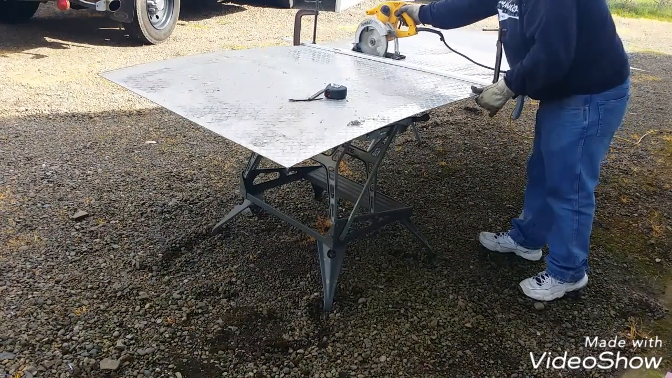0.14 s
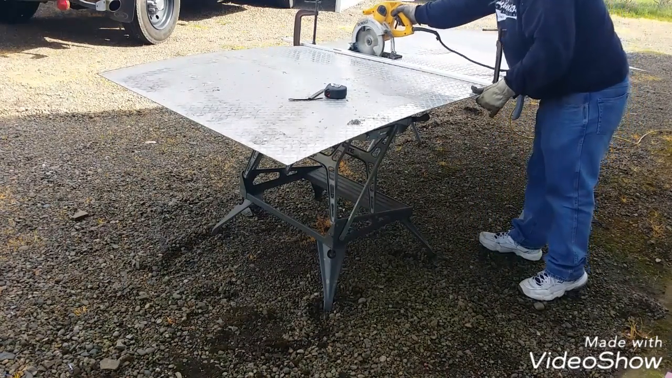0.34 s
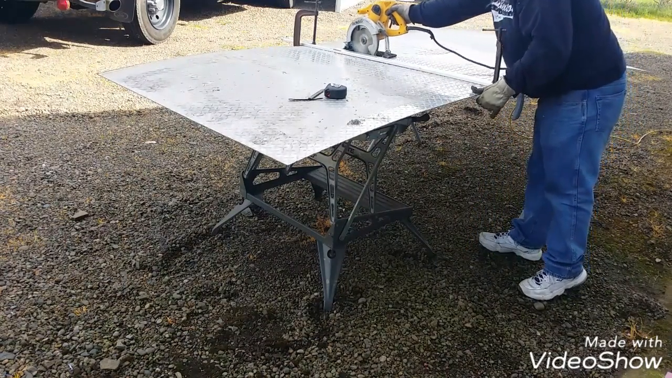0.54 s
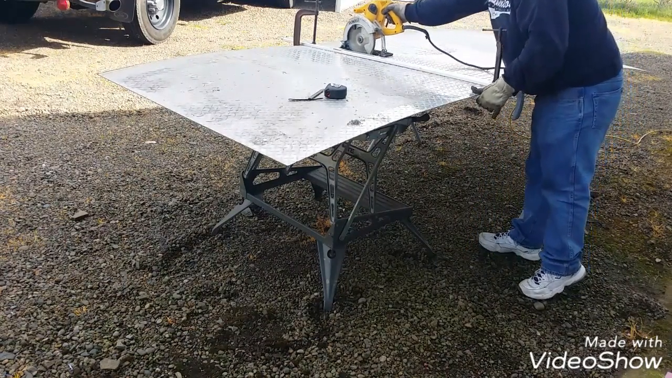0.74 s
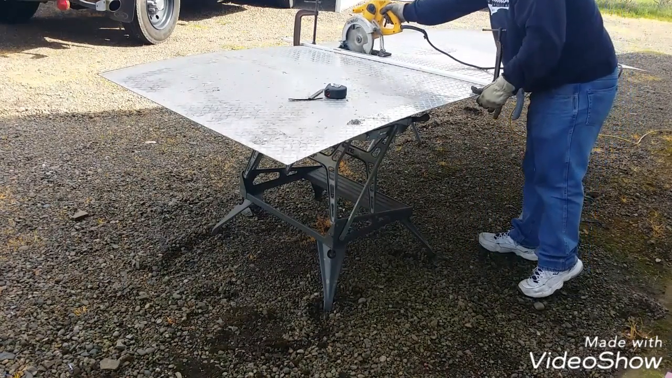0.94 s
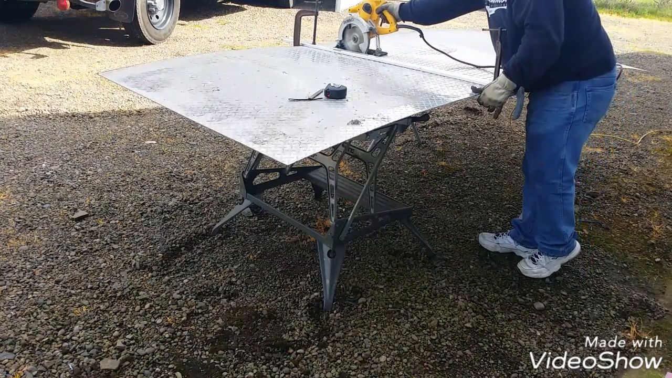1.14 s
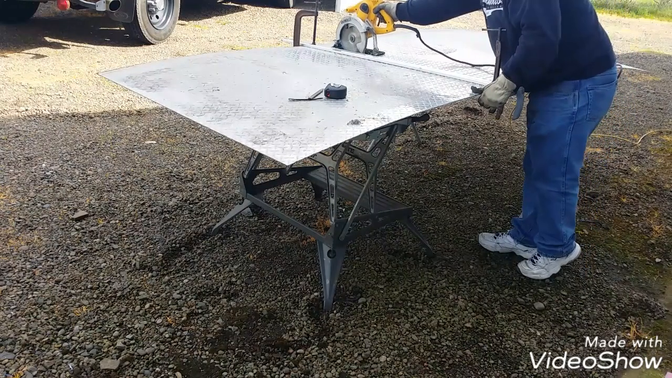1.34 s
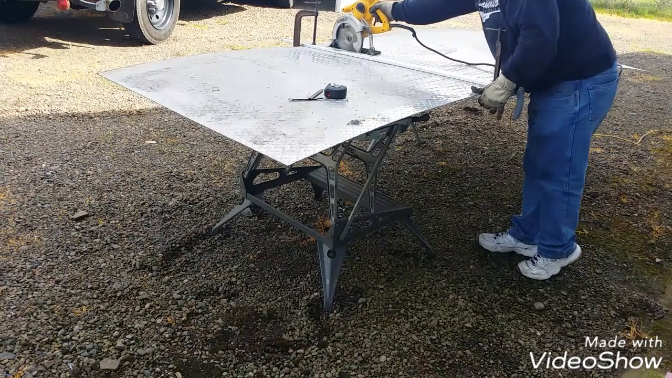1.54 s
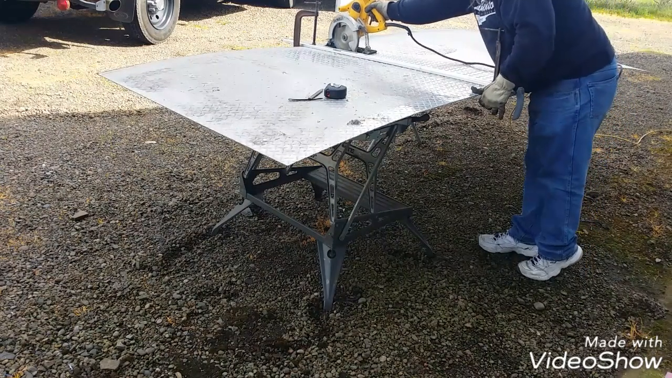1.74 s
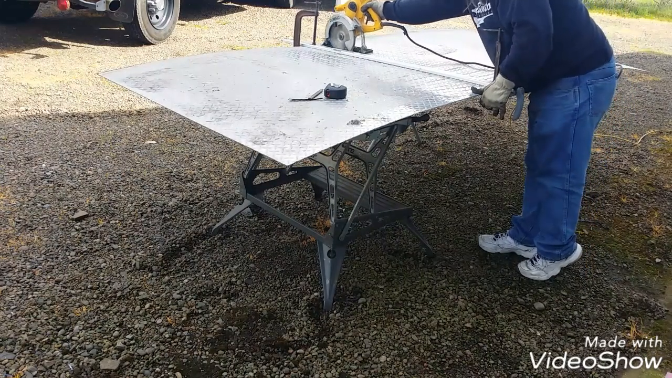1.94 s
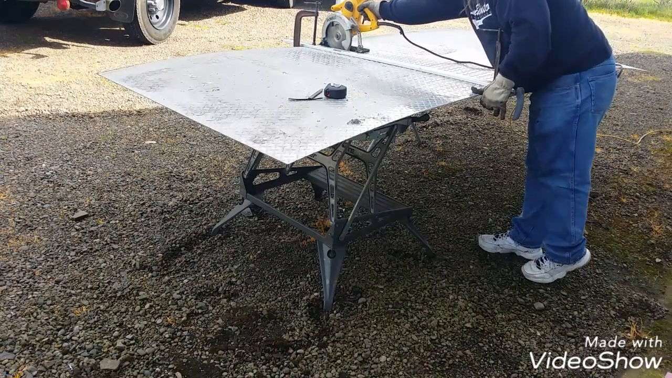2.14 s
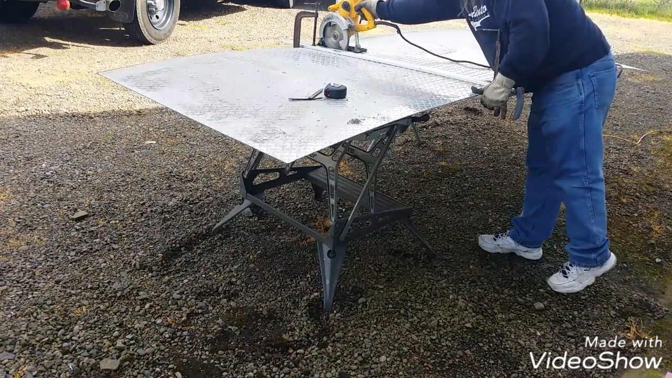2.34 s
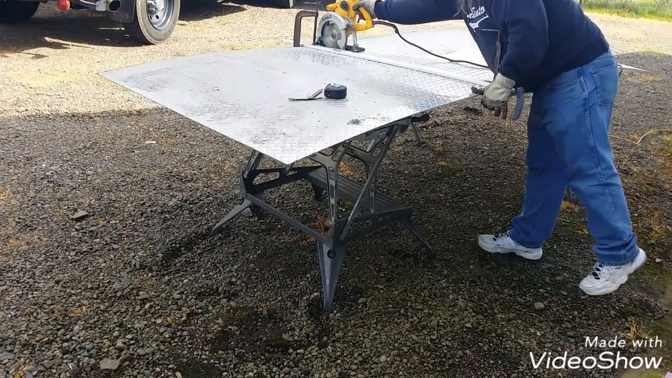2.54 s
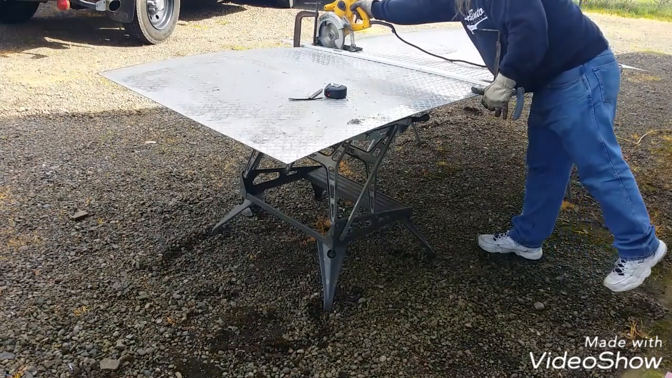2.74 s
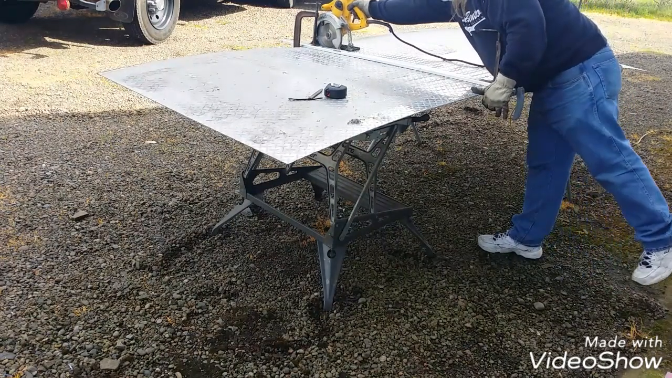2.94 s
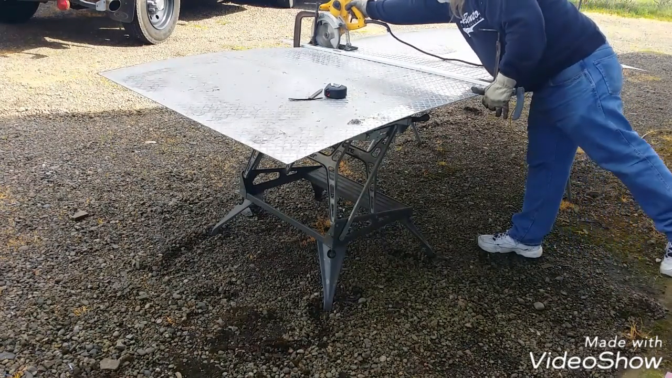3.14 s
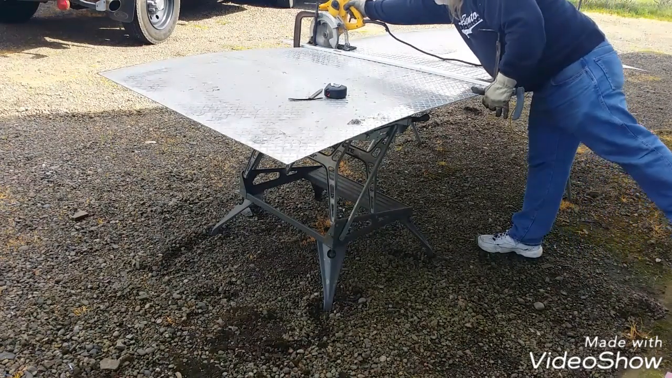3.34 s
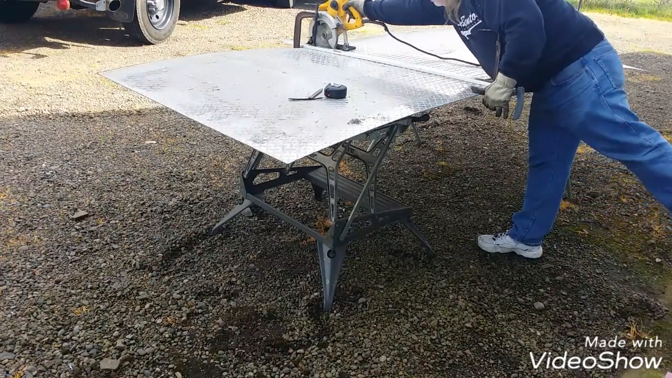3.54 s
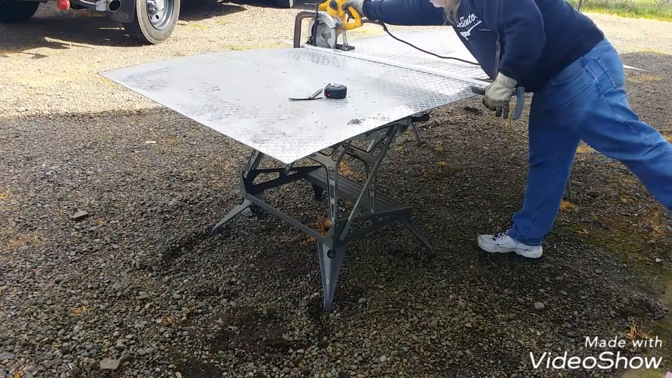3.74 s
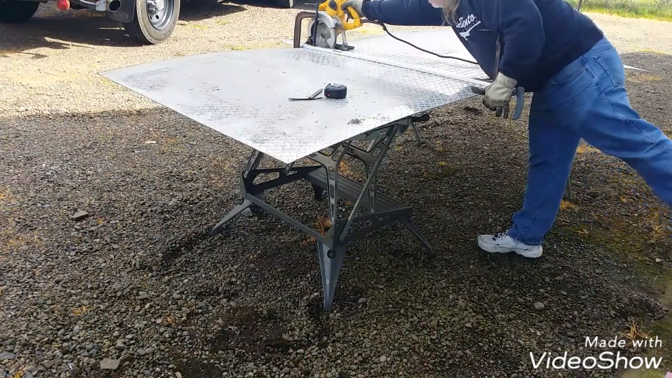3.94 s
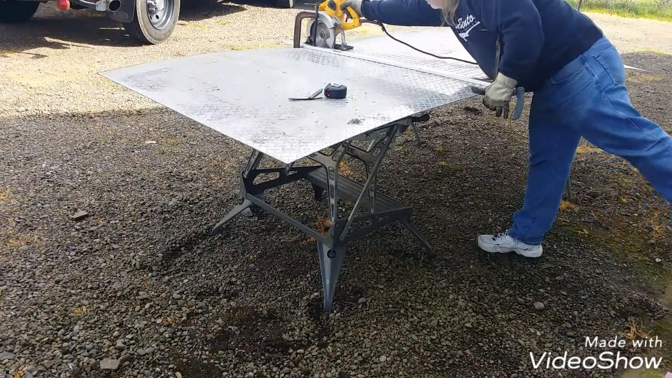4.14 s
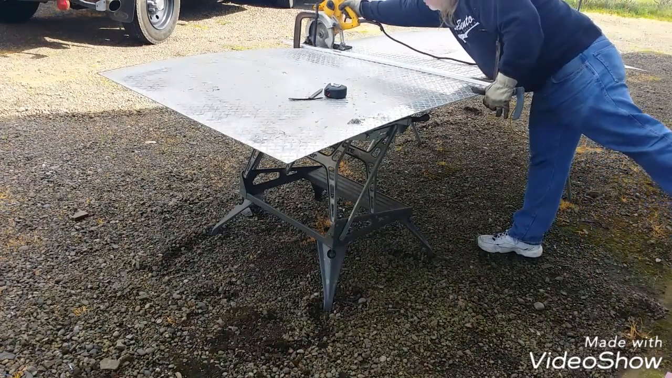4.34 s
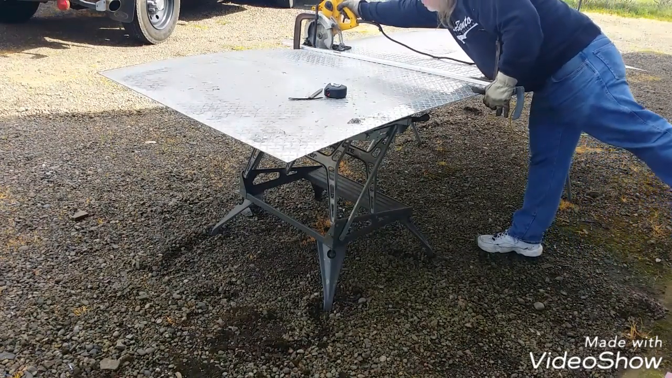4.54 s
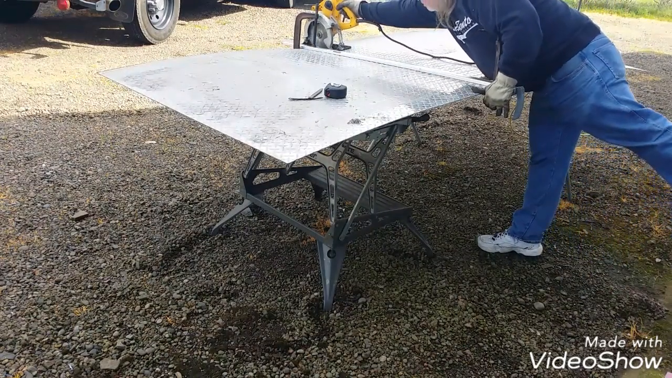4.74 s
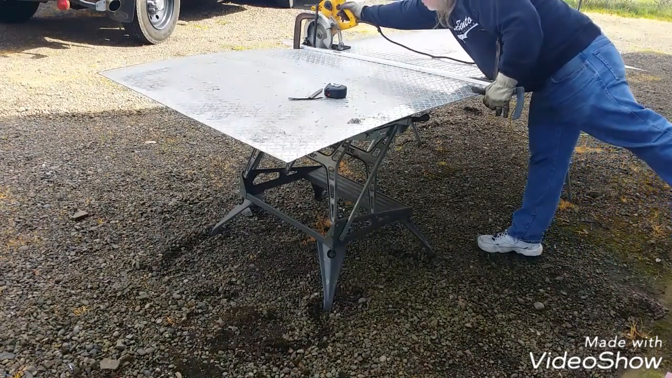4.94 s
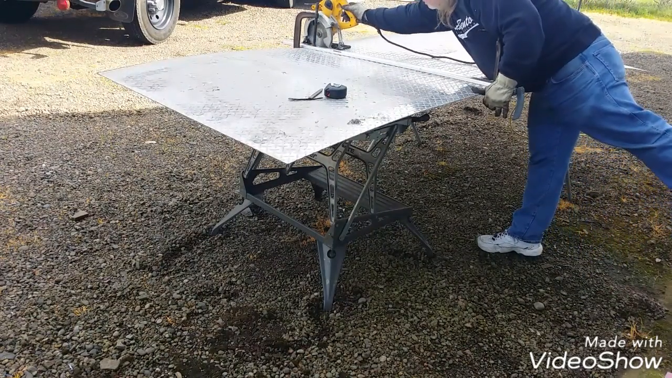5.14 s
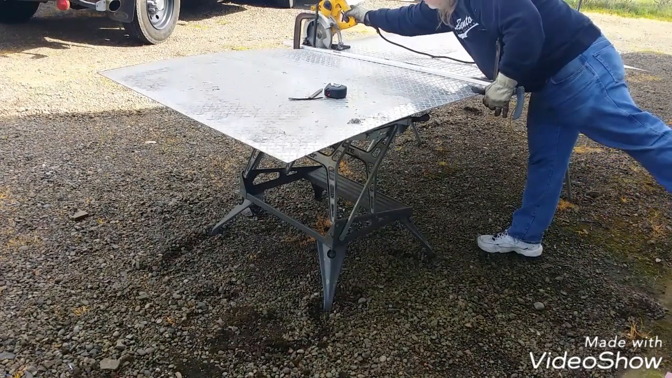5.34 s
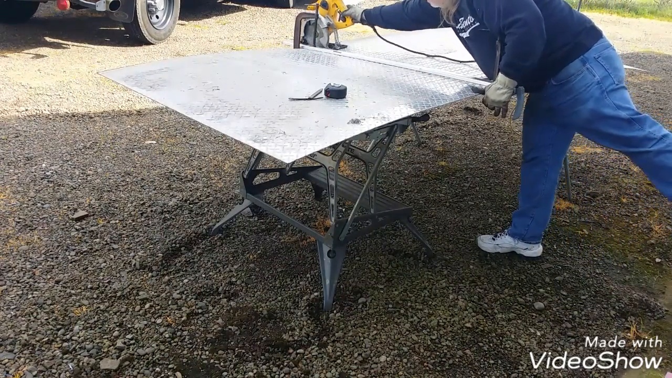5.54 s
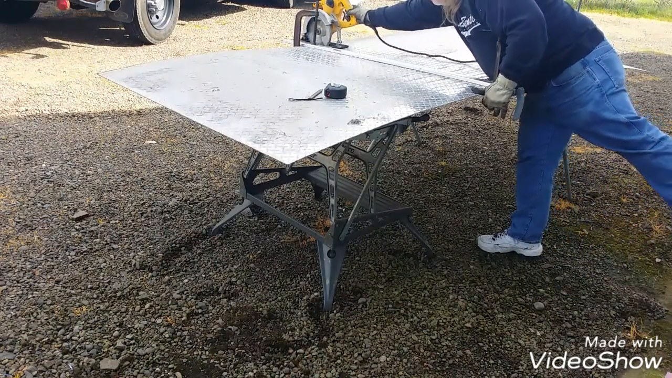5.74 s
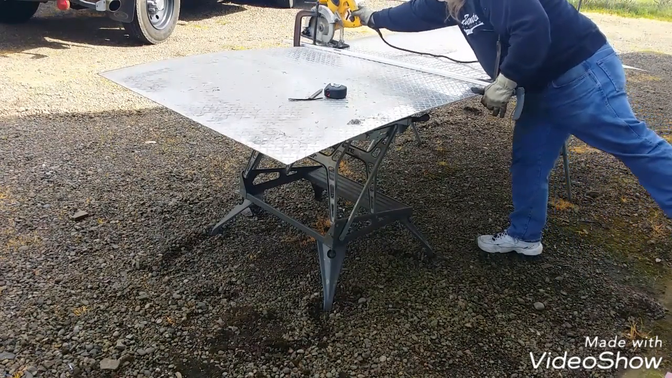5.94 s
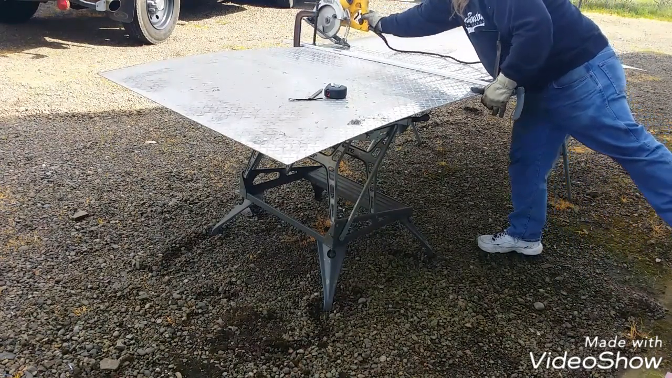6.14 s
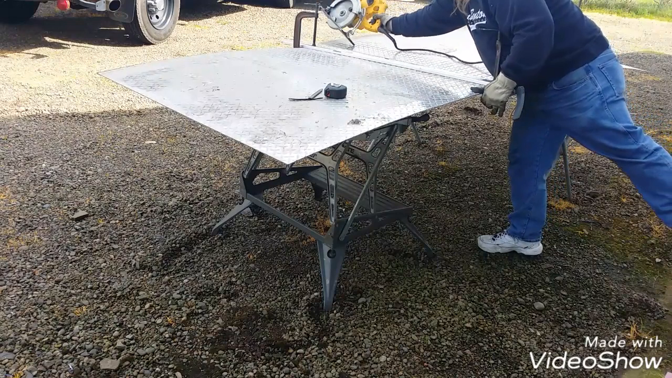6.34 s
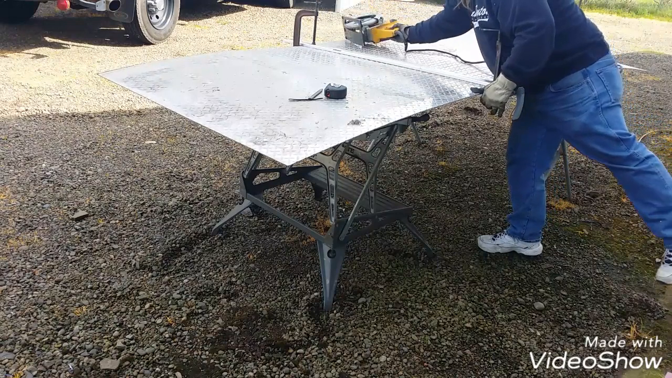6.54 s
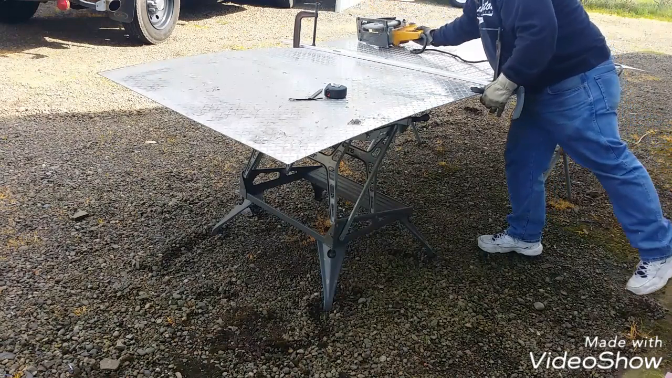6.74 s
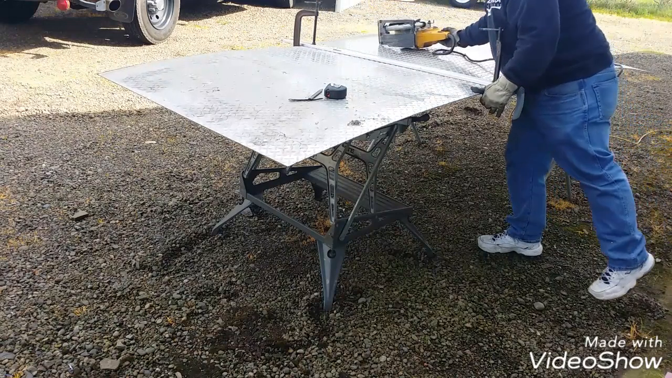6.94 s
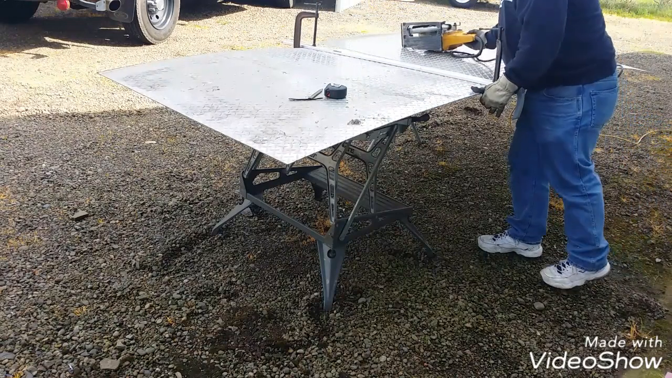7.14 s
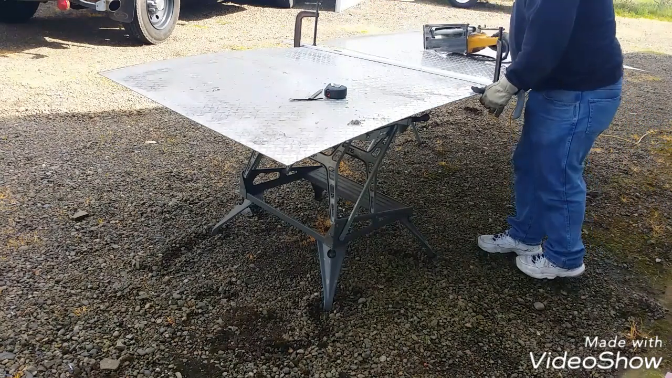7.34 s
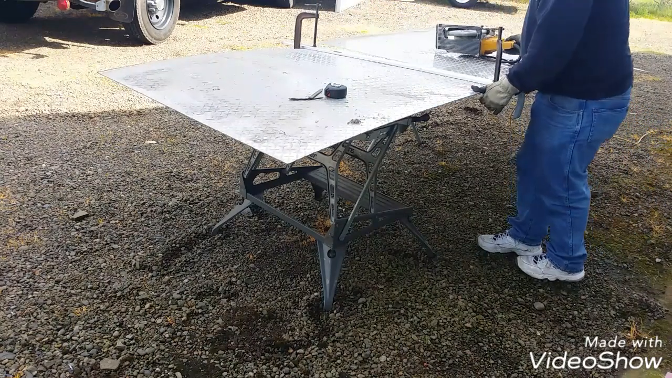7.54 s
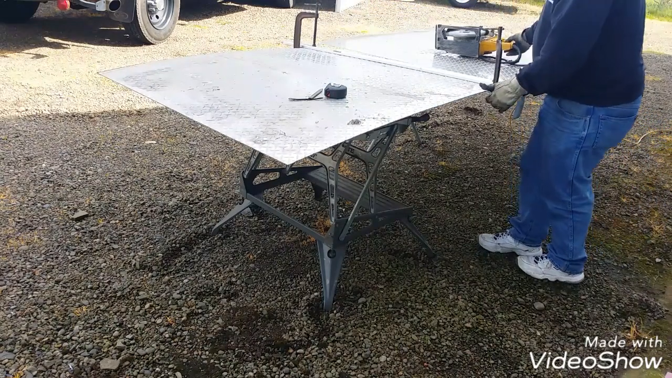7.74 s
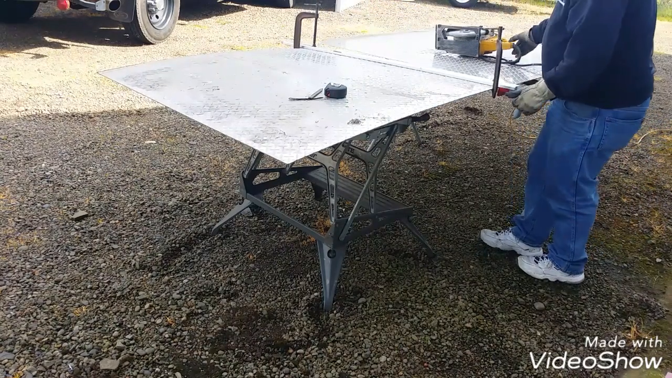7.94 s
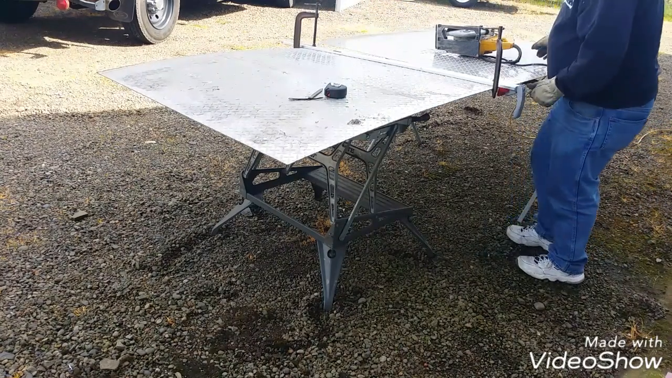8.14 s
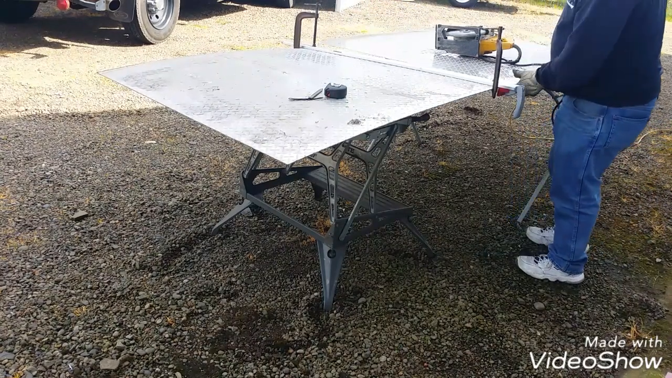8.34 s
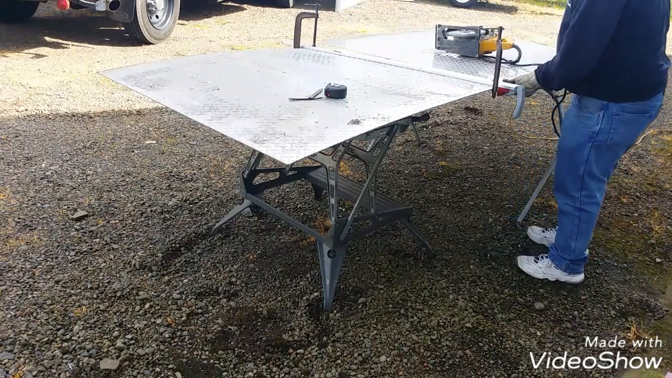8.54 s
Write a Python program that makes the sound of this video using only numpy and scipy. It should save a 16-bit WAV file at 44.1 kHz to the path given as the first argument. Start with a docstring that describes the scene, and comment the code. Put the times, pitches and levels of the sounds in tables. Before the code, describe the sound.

From 0 s a circular saw is already cutting an aluminium sheet outdoors: loud, harsh, bright chip hiss with a midrange roar, ringing blade squeal and a tooth whine around 2 kHz. The pitch sags over the first second, wavers low until about 2.1 s, then climbs gradually as the load lightens. A sharper squeal flares near 4.4 s. Around 4.95 s the power goes off; the whine drops in level and glides downward, roughening, while the blade still hisses in the slot. At 6.0-6.3 s it leaves the cut with a brief ring and the hiss collapses. A clack lands at about 6.65 s. From 6.9 to 7.9 s the saw is dragged over the sheet, booming, drumming, rasping and knocking, strongest around 7.3-7.5 s, with gritty crunching. It fades toward 8.5 s, under the last of the whine. Light low wind buffets and small puffs occur intermittently.

```python
"""A circular saw rips through an aluminium sheet on a stand outdoors: tooth impacts excite chip hiss and roar,
friction rings the blade's modes, and rotation makes a whine that follows the load. Power goes off near five
seconds; the coasting saw is lifted out, set down with a clack and dragged back across the booming sheet,
whose modes are driven by random contact. Low-passed turbulence gives a light breeze with gusts and puffs."""
import sys
import numpy as np
from scipy import signal
from scipy.fft import rfft, irfft
from scipy.io import wavfile
from scipy.ndimage import map_coordinates

SR = 44100
rng = np.random.default_rng(int(sys.argv[2]) if len(sys.argv) > 2 else 0)


def generate_wav(signal):
    """Clip the signal to [-1, 1] and save it as 16-bit WAV at the path in sys.argv[1]."""
    frames = np.transpose(np.atleast_2d(signal))
    scaled = np.clip(frames, -1, 1) * 32767
    pcm = np.round(scaled).astype(np.int16)
    wavfile.write(sys.argv[1], SR, pcm)


N = 378378
TIME = np.arange(N) / SR
FREQS = np.maximum(np.fft.rfftfreq(N, 1 / SR), 1)
TEETH = 24
REFERENCE_SPEED_HZ = 2350  # teeth per s
TRIGGER_OFF_S = 4.95


def from_db(db):
    """Logarithmic level: decibels to amplitude gain."""
    return 10 ** (np.asarray(db) / 20)


def rms_one(x):
    """Normalisation: scale to an rms of 1."""
    return x / np.sqrt(np.mean(x ** 2) + 1e-20)


def in_time(rows):
    """Linear interpolation: each column of a time table at every sample."""
    s, *columns = np.transpose(rows)
    return [np.interp(TIME, s, column) for column in columns]


def in_hz(points):
    """Interpolation on a logarithmic frequency axis: a spectrum table at every frequency."""
    hz, value = np.transpose(points)
    return np.interp(np.log(FREQS), np.log(hz), value)


def fade_in(start, end):
    """Linear ramp from 0 to 1, at least 10 ms long."""
    return np.clip((TIME - start) / max(end - start, .01), 0, 1)


def swells(rows):
    """Gaussian envelopes: each event adds a bell-shaped change in dB, computed on a coarse time grid."""
    coarse = TIME[::32]
    lift_db = sum(db * np.exp(-((coarse - s) / half_s) ** 2) for s, half_s, db in rows)
    return np.interp(TIME, coarse, lift_db)


def drift(rate_hz):
    """Low-pass filtered noise: a slow random wander of rms 1, made at a fortieth of the sample rate."""
    pole = np.exp(-80 * np.pi * rate_hz / SR)
    noise = rng.standard_normal(N // 40 + 2002)
    slow = signal.lfilter([1], [1, -2 * pole, pole * pole], noise)[2000:]  # skip the filter's start-up
    return np.interp(np.arange(N) / 40, np.arange(len(slow)), rms_one(slow))


def colour(spectrum):
    """Spectral shaping: gain by frequency of a smooth spectrum."""
    return from_db(in_hz(spectrum))


def lift(resonances):
    """Modal superposition: the power of a body's resonance peaks adds to a flat response."""
    hz = FREQS.astype("float32")
    power = 0
    for centre, width, db in resonances:
        detuning = (hz - float(centre)) * float(2 / width)
        power = power + float(from_db(db) ** 2 - 1) / (1 + detuning ** 2)
    return np.sqrt(np.maximum(1 + power, .1))


def radiate(force, gain, likeness):
    """Random excitation of a linear body: force-weighted noise is filtered and sent out partly correlated."""
    alike = np.clip(in_hz(likeness), -.99, .99)
    mid, side = rfft(force * rng.standard_normal((2, N))) * gain
    mid = irfft(mid, N)
    side = irfft(side * np.sqrt((1 - alike) / (1 + alike)), N)
    return np.array([mid + side, mid - side]) / np.std(mid)


# blade speed under power, sagging as the saw is pushed: start_s [s], tooth_rate [teeth per s]
SPEED = [(0, 2312), (.25, 2285), (.55, 2160), (.95, 2030), (1.2, 2125), (1.55, 2100), (2.1, 2025),
         (2.55, 2170), (2.9, 2165), (3.3, 2220), (3.6, 2298), (3.95, 2357), (4.7, 2404), (4.95, 2460)]
# load is 0 at the free speed and 1 at the laboured speed [teeth per s]
FREE_HZ, LABOURED_HZ = 2460, 2050
DRAG_PER_S, FRICTION_HZ_PER_S = .373, 149  # air drag and bearing friction slow the unpowered blade


def blade_speed():
    """Rotational deceleration: teeth per second under power and coasting, and the load from the speed sag."""
    powered_hz, = in_time(SPEED)
    load = (FREE_HZ - powered_hz) / (FREE_HZ - LABOURED_HZ)
    friction_hz = FRICTION_HZ_PER_S / DRAG_PER_S
    coasting = np.exp(-DRAG_PER_S * np.maximum(TIME - TRIGGER_OFF_S, 0))
    return (powered_hz + friction_hz) * coasting - friction_hz, load


def blade_turns(tooth_hz, wobble):
    """Phase integration: the turns of the blade so far, with a trembling speed."""
    return np.cumsum(tooth_hz * (1 + wobble * drift(28.5))) / SR / TEETH


# how hard the blade is fed into the metal: start_s [s], feed_db [dB, set against REFERENCE_FEED_DB]
FEED = [(0.0, -14), (0.1, -16.5), (0.3, -15.5), (.55, -15), (1.9, -15.5), (3.25, -16), (3.42, -16.5),
        (3.55, -15), (3.67, -16.5), (4.3, -17), (4.5, -17), (4.68, -19.5), (4.76, -18), (5.15, -19),
        (5.27, -19), (5.4, -18.5), (5.56, -19.8), (5.65, -18), (5.77, -20), (5.86, -18), (5.93, -21),
        (6.02, -19.5)]
REFERENCE_FEED_DB = -15
HISS_DB, ROAR_DB = -14.5, -25  # chip hiss, and roar of sheet and fan, at the reference feed
ROAR_FOLLOWS = 1.13  # dB of roar per dB of feed
EASE_ROAR_DB, EASE_ROAR_S = 3.5, 1  # the nearly severed sheet rings more freely
EXIT_S, EXIT_LENGTH_S, EXIT_HISS_DB, EXIT_ROAR_DB = 6.005, 0.23, -22, -9  # the blade leaves the kerf


def cut_levels(uneven_db):
    """Excitation strength: hiss and roar in dB follow the feed and fall as the blade leaves the kerf."""
    out_of_kerf = fade_in(EXIT_S, EXIT_S + EXIT_LENGTH_S)
    feed_db = in_time(FEED)[0] - REFERENCE_FEED_DB
    hiss_db = HISS_DB + feed_db + EXIT_HISS_DB * out_of_kerf
    freed_db = EASE_ROAR_DB * fade_in(TRIGGER_OFF_S, TRIGGER_OFF_S + EASE_ROAR_S)
    roar_db = ROAR_DB + ROAR_FOLLOWS * feed_db + freed_db + EXIT_ROAR_DB * out_of_kerf
    return hiss_db, roar_db + uneven_db * drift(28)


# spectrum of the torn chips: frequency_hz [Hz], density_db [relative dB per Hz]
CHIPS = [(1500, -30), (2600, -9.5), (3600, -5), (4600, -7.5), (5800, -1.5), (7200, -1), (7700, -4.5),
         (8800, -6), (9600, -2.5), (10700, -8), (13000, -9), (15400, -13.5)]
# spectrum of the roar of sheet and fan: frequency_hz [Hz], density_db [relative dB per Hz]
ROAR = [(60, -30), (130, -20.5), (220, -17.5), (350, -14), (500, -14), (750, -3.5), (950, -1), (1300, -4.5),
        (1650, -1.5), (2050, -2.5), (2500, -2.5), (3200, -14), (4500, -6.5), (7500, -20), (15000, -39)]
# resonances of the saw: frequency_hz [Hz], width_hz [Hz], lift_db [dB]
SAW_BODY = [(885, 36, 2), (1099, 46, 7), (1340, 70, 7.5), (1508, 16, 6.5), (1778, 55, 6), (1830, 51, 6),
            (2416, 330, 6)]
# left-right likeness of the saw: frequency_hz [Hz], correlation [-1 to 1]
SAW_LIKENESS = [(200, 0.17), (1000, 0.69), (1800, 0.56), (2100, 0.53), (2400, 0.55), (3000, 0.3),
                (4500, 0.23), (6200, 0.43), (7800, 0.17), (8600, 0.062), (9700, 0.074), (11000, 0.029),
                (15000, 0.068)]
RUMBLE_HZ, RUMBLE_WAVER_DB = 580, 4.5  # the low end of the roar comes and goes
RUMBLE_DB, RUMBLE_LOAD_DB = -2.5, 5  # its change with the blade free, and what full load adds


def cutting(turns, load, hiss_db, roar_db, bite_depth, runout_db, chatter_db, surge_db, dull_hz):
    """Periodic impact excitation: teeth tear chips, biting harder once a turn and chattering in the kerf."""
    bites = 1 + bite_depth * np.cos(2 * np.pi * TEETH * turns)
    force = bites * from_db(runout_db * np.sin(2 * np.pi * turns) + chatter_db * drift(130))
    chips = from_db(hiss_db + surge_db * drift(17.4)) * radiate(force, colour(CHIPS), SAW_LIKENESS)
    # out of the kerf the teeth only stir the air, which is duller
    dull = signal.sosfilt(signal.butter(3, min(dull_hz, SR / 3), fs=SR, output="sos"), chips)
    lifted = fade_in(5.85, 6.66)
    roar = from_db(roar_db) * radiate(force, colour(ROAR) * lift(SAW_BODY), SAW_LIKENESS)
    rumble = signal.sosfiltfilt(signal.butter(3, RUMBLE_HZ, fs=SR, output="sos"), roar)
    waver = rms_one(from_db(RUMBLE_WAVER_DB * drift(15.0)))
    roar = roar + rumble * (from_db(RUMBLE_DB + RUMBLE_LOAD_DB * load) * waver - 1)
    return (chips * (1 - lifted) + dull * lifted + roar) * (1 - fade_in(6.45, 6.89))


# blade modes: pitch_hz [Hz at reference speed], swing_rate_hz [Hz], level_db [relative dB],
# pinch_share [part of a pinch's lift], eased_db [dB change once the push eases]
BLADE = [(1758, 10, -7.5, 0, 2), (3280, 26, -9.5, 0, -6), (3640, 11, -14, 0.081, -24),
         (6310, 22, 2, 1, -3.5), (7470, 13, -4, 0.28, 5)]
# moments when the kerf pinches the blade: centre_s [s], half_length_s [s], lift_db [dB]
PINCHES = [(1.3, 0.65, 2.7), (2.35, 0.1, 1.1), (4.44, 0.18, 12.8)]
SQUEAL_DB = -15.5  # against the hiss
EASE_S, EASE_LENGTH_S = 4.55, 0.07  # the push eases near the far edge


def squeal(tooth_hz, hiss_db, stiffening):
    """Friction-excited modes: the kerf rubs the blade into ringing, and spin stiffening raises the pitch."""
    clock = np.cumsum(1 + stiffening * ((tooth_hz / REFERENCE_SPEED_HZ) ** 2 - 1)) / SR
    pinch_db = swells(PINCHES)
    eased = fade_in(EASE_S, EASE_S + EASE_LENGTH_S)
    out = 0
    for hz, rate_hz, db, share, eased_db in BLADE:
        swing = (drift(rate_hz) + 1j * drift(rate_hz)) * np.exp(2j * np.pi * hz * clock)
        swing = swing / np.sqrt(np.abs(swing) + .01)  # friction evens the swing
        out = out + from_db(db + share * pinch_db + eased_db * eased) * rms_one(np.real(swing))
    return from_db(hiss_db + SQUEAL_DB) * out * (1 - fade_in(6.46, 6.9))


# how loudly blade and sheet radiate a tooth tone, before load and speed: pitch_hz [Hz], level_db [dB]
TOOTH_RESPONSE = [(900, -56), (1200, -32.5), (1450, -22.5), (1600, -33), (1740, -21.5), (1850, -29),
                  (1950, -29), (2080, -31), (2190, -33), (2260, -25.5), (2385, -26), (2410, -27.5),
                  (2460, -29)]
# flares and dips of the tooth tone: centre_s [s], half_length_s [s], lift_db [dB]
TOOTH_WAVERS = [(0, 0.071, -11), (3.44, 0.017, 2.5), (3.515, .02, -9), (3.565, .025, 6), (3.75, .025, -4),
                (3.83, 0.091, 4.5), (4.09, .05, -4), (4.25, 0.022, -3), (4.32, 0.036, 2), (4.6, 0.048, 1.5),
                (4.665, 0.016, -14), (4.86, 0.04, -6), (4.97, 0.026, -13)]
# second harmonic during the coast, rising out of the kerf and dying after 7.6 s:
# start_s [s], gain_db [dB over the kerf]
OCTAVE_COAST = [(5.6, 0), (6.05, 5), (6.3, 12), (6.5, 14), (6.8, 17), (6.95, 22), (7.2, 16), (7.6, 21),
                (7.9, 9), (8.2, -4)]
# howls of the gears when the feed jerks: centre_s [s], half_length_s [s], lift_db [dB]
JERKS = [(.99, 0.029, 5), (1.42, 0.044, 6), (1.65, 0.017, 10), (1.92, 0.033, 14), (2.6, 0.26, 4.5),
         (3.03, 0.1, 13)]
TOOTH_LOAD_DB = -26.5  # a deeply buried blade is damped: change at full load
PINCH_SHARE = 0.28  # share of a pinch's lift that the tooth tones get
OCTAVE_DB = -43.5  # second harmonic in the kerf
GEAR_DB, GEAR_LOAD_DB = -49, 8.5  # gear tones without load, and what full load adds
GEAR_OCTAVE_DB = 2.5  # the gear tone's second harmonic, against its first
# hum of the motor shaft: turns per blade turn, level running free, change under full load
MOTOR_TURNS, MOTOR_DB, MOTOR_LOAD_DB = 3.47, -54, -28
WHINE_DB_PER_OCTAVE = 8  # gain per doubling of speed
OFF_POWER_DB, UNLOAD_S = -5.5, 0.1  # the tones drop as the trigger is let go


def whine(turns, tooth_hz, load, flutter_db, side_flutter_db, rattle, rattle_hz):
    """Rotational harmonics: tones locked to the blade cross resonances, follow load, and coast roughly."""
    pinch_db = PINCH_SHARE * swells(PINCHES)
    tooth_db = np.interp(tooth_hz, FREQS, in_hz(TOOTH_RESPONSE)) + TOOTH_LOAD_DB * load ** 2
    tooth_db = tooth_db + pinch_db + swells(TOOTH_WAVERS)
    octave_db = OCTAVE_DB + in_time(OCTAVE_COAST)[0] + pinch_db
    gear_db = GEAR_DB + GEAR_LOAD_DB * load + swells(JERKS)
    # the motor hum gets this drop twice: here and with all the tones
    off_power_db = OFF_POWER_DB * fade_in(TRIGGER_OFF_S, TRIGGER_OFF_S + UNLOAD_S)
    motor_db = MOTOR_DB + MOTOR_LOAD_DB * load + off_power_db
    speed_db = WHINE_DB_PER_OCTAVE * np.log2(tooth_hz / REFERENCE_SPEED_HZ) + off_power_db
    slack = np.clip(rattle, 0, 1) * fade_in(5.2, 5.21)
    # cycles per blade turn, and level
    tones = [(TEETH, tooth_db), (2 * TEETH, octave_db),
             (TEETH * 2 / 3, gear_db), (TEETH * 4 / 3, gear_db + GEAR_OCTAVE_DB),
             (MOTOR_TURNS, motor_db)]
    out = 0
    for order, level_db in tones:
        waver_db = flutter_db * drift(41) + side_flutter_db * np.array([drift(14), drift(25.0)])
        steady = np.sqrt(2 * (1 - slack ** 2))
        swing = steady + slack * (drift(rattle_hz) + 1j * drift(rattle_hz))
        tone = np.real(swing * np.exp(2j * np.pi * order * turns))
        out = out + from_db(level_db + speed_db + waver_db) * tone
    return out


def free_ring(level_db, decay_s):
    """Damped free vibration: leaving the kerf, the blade rings on in a low mode at 1518 Hz."""
    envelope = fade_in(5.93, 6.16) * np.exp(-np.maximum(TIME - 6.08, 0) / decay_s)
    return from_db(level_db) * envelope * np.sin(2 * np.pi * 1518 * TIME)


# strength of the sheet's scraping and rumbling swell:
# start_s [s], strength_db [dB, set against REFERENCE_SCRAPE_DB]
SCRAPE = [(6.75, -42), (6.916, -37.5), (7.06, -32), (7.1, -30), (7.24, -28), (7.29, -23.5), (7.41, -25),
          (7.47, -25), (7.62, -30), (7.874, -34.5), (7.98, -34), (8.194, -38.5), (8.57, -42.5)]
# spectra of the sheet's boom, drumming and rasp, and of the crunching swarf:
# frequency_hz [Hz], density_db [relative dB per Hz]
BOOM = [(25, -44), (45, -39), (70, 1), (150, -1.5), (200, -7), (290, 2), (400, -7), (520, -21), (900, -45)]
DRUM = [(300, -55), (450, 5), (620, -1), (740, -3.5), (1000, -27), (2000, -48)]
RASP = [(450, -24), (780, -3), (1300, -3), (1650, -3.5), (2000, -9.5), (2450, -7.5), (3100, -11.5),
        (5000, -17), (12000, -46)]
GRIT = [(1500, 1.5), (2500, -1.5), (3700, -2), (5000, -1.5), (7000, -3.5), (8500, -9.5), (11000, -17),
        (15000, -37)]
# resonances of the loose sheet: frequency_hz [Hz], width_hz [Hz], lift_db [dB]
SHEET = [(146, 7, 9), (215, 8, 6), (262, 14, 7), (297, 10, 8), (380, 9, 11), (481, 8, 6), (545, 14, 9),
         (599, 11, 9), (644, 6, 13), (750, 8, 5), (790, 12, 5), (946, 11, 5), (1070, 15, 7), (1274, 27, 6),
         (1610, 16, 3), (2400, 240, 5.5), (3890, 43, 6)]
# left-right likeness of the whole sheet: frequency_hz [Hz], correlation [-1 to 1]
SHEET_LIKENESS = [(40, .8), (200, 1), (700, 0.88), (1500, 0.71), (2400, 0.98), (3200, 0.48), (7000, 0.33),
                  (12000, 0.16)]
REFERENCE_SCRAPE_DB = -22
TOUCH_S, SETTLE_S = 6.49, 0.19  # the shoe touches down and takes the saw's weight
GRIT_FALL_S, GRIT_FALL_DB_PER_S = 7.95, 22.5  # the crunching starts to die faster
# each voice at the reference strength, and its dB per dB of strength
BOOM_DB, BOOM_FOLLOWS = -22.5, 1
DRUM_DB, DRUM_FOLLOWS = -18.5, 1.74
RASP_DB, RASP_FOLLOWS = -20, 0.86
GRIT_DB, GRIT_FOLLOWS = -27, 0.55


def scraping(sheet_lift, judder_db, grain_db):
    """Sliding-contact excitation: a juddering force makes the sheet boom, drum and rasp over crunching swarf."""
    strength_db = in_time(SCRAPE)[0] - REFERENCE_SCRAPE_DB
    grit_fall_db = -GRIT_FALL_DB_PER_S * np.maximum(TIME - GRIT_FALL_S, 0)
    force = from_db(judder_db * drift(80))
    gritty = force * from_db(grain_db * drift(320))
    layers = [(BOOM_DB, BOOM_FOLLOWS, force, BOOM), (DRUM_DB, DRUM_FOLLOWS, force, DRUM),
              (RASP_DB, RASP_FOLLOWS, force, RASP), (GRIT_DB + grit_fall_db, GRIT_FOLLOWS, gritty, GRIT)]
    sheet = 0
    for db, follows, push, spectrum in layers:
        voice = radiate(push, colour(spectrum) * sheet_lift, SHEET_LIKENESS)
        sheet = sheet + from_db(db + follows * strength_db) * voice
    return fade_in(TOUCH_S, TOUCH_S + SETTLE_S) * sheet


# shoe and guard knocking on the sheet: start_s [s], level_db [relative dB]
KNOCKS = [(6.323, -37), (6.625, -36), (6.657, -24), (6.688, -29), (6.889, -35), (7.085, -30), (7.195, -26),
          (7.262, -26), (7.283, -31), (7.315, -28), (7.336, -31), (7.398, -28), (7.545, -28), (7.591, -26),
          (7.821, -30), (7.98, -31), (8.229, -44)]
# spectrum of a knock: frequency_hz [Hz], density_db [relative dB per Hz]
KNOCK_COLOUR = [(80, -2), (300, -1), (900, 5), (2400, 2), (4000, -2), (7000, -1.5), (10000, -14),
                (15000, -22)]


def knocks(sheet_lift, decay_s):
    """Impact excitation: each knock is a decaying burst of random metal contact on the sheet."""
    force = 0
    for s, db in KNOCKS:
        force = force + from_db(db) * (TIME >= s) * np.exp(-np.clip(TIME - s, 0, 1) / decay_s)
    rattle = radiate(1, colour(KNOCK_COLOUR) * sheet_lift, SHEET_LIKENESS)
    return from_db(-1.0) * force * rattle


# bands that briefly flare or fade:
# centre_s [s], half_length_s [s], frequency_hz [Hz], width_hz [Hz], lift_db [dB]
FLARES = [(.53, .035, 3600, 1800, 4), (1.2, .05, 5350, 1500, 3.5), (1.225, 0.058, 930, 150, 7),
          (1.6, 0.074, 3750, 600, 5), (1.865, 0.068, 3850, 600, 3), (2.34, 0.014, 1000, 400, 6),
          (3.156, .09, 1000, 300, 3), (4.02, 0.19, 10600, 500, 5), (4.8, .17, 350, 35, 12),
          (5.66, 0.038, 3500, 1500, 2), (6.015, 0.079, 7340, 1200, 5), (6.95, .25, 335, 90, 6.5),
          (7.302, 0.14, 616, 90, 5.5), (7.4, .04, 1000, 700, 4), (8.123, .12, 390, 24, 6),
          (8.15, 0.2, 292, 90, -12), (8.2, 0.46, 1254, 40, 4.5), (8.3, .3, 1030, 160, -4),
          (8.35, 0.45, 800, 30, 5), (8.45, .15, 500, 24, 5)]


def flaring(x):
    """Local resonant filtering: single bands rise or sink for a moment."""
    out = x.copy()
    for s, half_s, hz, width, db in FLARES:
        near = slice(max(int((s - 3 * half_s) * SR), 0), int((s + 3 * half_s) * SR))
        band = signal.lfilter(*signal.iirpeak(hz, hz / width, fs=SR), x[:, near])
        bell = np.exp(-((TIME[near] - s) / half_s) ** 2)
        out[:, near] += band * (from_db(db * bell) - 1)
    return out


def spectral_flutter(x, depth_db, width_hz, hold_s, size=2048):
    """Random spectral modulation: narrow bands of the noise swell and fade at random."""
    overlap = size * 3 // 4
    _, _, frames = signal.stft(x, nperseg=size, noverlap=overlap)
    swell = rng.standard_normal((frames.shape[1], frames.shape[2]))
    spans = [width_hz * size / SR, hold_s * SR * 4 / size]  # smoothing in bins, then in frames
    for axis, span in enumerate(spans):
        pole = np.exp(-1 / span)
        swell = signal.filtfilt([1 - pole], [1, -pole], swell, axis=axis, method="gust")
    gain = rms_one(from_db(depth_db * rms_one(swell)))
    return signal.istft(frames * gain, nperseg=size, noverlap=overlap)[1][:, :N]


# the saw's bearing: start_s [s], right_lag [samples]
BEARING = [(0, -.3), (2.5, .7), (5.9, 1.6), (6.4, -2), (8.58, -4)]


def place(x):
    """Time difference of arrival: the saw's bearing delays one side against the other."""
    lag, = in_time(BEARING)
    sides = []
    for side, sign in zip(x, (1, -1)):
        position = np.arange(N) + sign * lag / 2
        sides.append(map_coordinates(side, [position], order=3, mode="nearest"))
    return np.array(sides)


# gusts: centre_s [s], half_length_s [s], lift_db [dB]
GUSTS = [(.04, 0.033, 3), (.26, 0.023, 10), (.48, 0.022, 2), (.72, 0.094, 12), (1.03, 0.056, 11),
         (1.93, 0.083, 7), (2.25, .06, 10), (2.42, 0.033, 12), (2.69, 0.08, 18), (4.2, 0.2, 12),
         (4.57, 0.069, 22), (4.78, 0.035, 19), (4.87, 0.02, 17), (5.16, 0.037, 15), (5.55, 0.045, 15),
         (6.2, 0.35, 13.5)]
# spectrum of the buffeting: frequency_hz [Hz], density_db [relative dB per Hz]
BUFFET = [(25, -55), (50, -16), (75, 1), (130, -0.5), (200, -4.5), (310, -4.5), (520, -9), (900, -29)]
# puffs of wind on the ports: start_s [s], level_db [dB before filtering], left_minus_right_db [dB]
PUFFS = [(0.699, -27, 5), (0.765, -31, 25), (1.04, -23, 14), (1.086, -38, 0), (1.853, -22.5, 16),
         (2.236, -27, -8), (2.722, -36, 0), (4.532, -30, -14), (4.594, -32, -14), (4.779, -32, -2),
         (5.35, -23, 24)]
# the breeze drops to a lull
BREEZE_DB, LULL_S, LULL_LENGTH_S, LULL_DB = -47.5, 1.98, 0.83, -18.5
FAR_DB = -66  # the air never stills below this


def wind(lumpy_db, gusty_db, puff_hz, puff_decay_s):
    """Turbulent pressure fluctuation: a breeze buffets each port on its own, with gusts and sharp puffs."""
    level_db = BREEZE_DB + LULL_DB * fade_in(LULL_S, LULL_S + LULL_LENGTH_S)
    level_db = level_db + swells(GUSTS) + gusty_db * drift(8.4)
    eddies = from_db(lumpy_db * drift(32)) * rng.standard_normal((2, N))
    buffeting = rms_one(irfft(rfft(eddies) * colour(BUFFET), N))
    out = np.hypot(from_db(level_db), from_db(FAR_DB)) * buffeting
    age = np.arange(4096) / SR
    puff = np.cos(2 * np.pi * puff_hz * age) * np.exp(-age / puff_decay_s)
    puff = signal.sosfilt(signal.butter(4, 520, fs=SR, output="sos"), puff)
    for s, db, pan_db in PUFFS:
        start = int(s * SR)
        out[:, start:start + len(puff)] += from_db(db + pan_db * np.array([[.5], [-.5]])) * puff
    return out


# brief dips of the bass: centre_s [s], half_length_s [s], lift_db [dB]
BASS_DIPS = [(.93, 0.012, -2), (1.095, 0.015, -12), (2.04, 0.017, -17), (2.3, 0.018, -4),
             (2.55, 0.027, -20), (3.11, 0.047, -18), (3.265, 0.016, -22), (4.06, .035, -9),
             (5.06, .015, -6), (5.41, 0.013, -10)]


def bass_dips(x):
    """Band-limited amplitude modulation: the level below 650 Hz dips briefly now and then."""
    bass = signal.sosfiltfilt(signal.butter(4, 650, fs=SR, output="sos"), x)
    return x + bass * (from_db(swells(BASS_DIPS)) - 1)


def scene():
    """Superposition of sources: the saw in the cut, then dragged over the sheet, in a light breeze."""
    tooth_hz, load = blade_speed()
    turns = blade_turns(tooth_hz, wobble=0.00101)
    hiss_db, roar_db = cut_levels(uneven_db=0.88)
    sheet_lift = lift(SHEET)
    rough = cutting(turns, load, hiss_db, roar_db, bite_depth=0.36, runout_db=0.1, chatter_db=0.56,
                    surge_db=0.54, dull_hz=10800)
    rough = rough + scraping(sheet_lift, judder_db=1.5, grain_db=2.0)
    rough = rough + knocks(sheet_lift, decay_s=0.025)
    tones = squeal(tooth_hz, hiss_db, stiffening=.012) + free_ring(level_db=-28, decay_s=0.2)
    tones = tones + whine(turns, tooth_hz, load, flutter_db=1.5, side_flutter_db=1.0,
                          rattle=1.0, rattle_hz=30)
    # wide bands first, then narrow ones
    rough = spectral_flutter(rough, depth_db=0.77, width_hz=130, hold_s=0.015, size=512)
    metal = spectral_flutter(flaring(rough), depth_db=3.0, width_hz=5.8, hold_s=0.029) + tones
    breeze = wind(lumpy_db=3.5, gusty_db=3.5, puff_hz=111, puff_decay_s=0.0019)
    return bass_dips(place(metal) + breeze)


# the two microphone ports: frequency_hz [Hz], left_minus_right_db [dB]
PORTS = [(100, -0.5), (1500, -0.5), (2400, 0), (3600, -0.7), (5200, 0.5), (6100, 2.5), (6850, 7.5),
         (7500, 1.5), (8500, 1.5), (9600, 0.6), (15000, -0.5)]


def record(dry):
    """Transducer response: ports colour each side, peaks saturate softly, deep bass and top are cut."""
    heard = irfft(rfft(dry) * from_db(in_hz(PORTS) * [[.5], [-.5]]), N)
    heard = signal.sosfilt(signal.butter(2, 45, "high", fs=SR, output="sos"), heard)
    heard = heard / (1 + (heard / .76) ** 8) ** (1 / 8)
    return signal.sosfilt(signal.ellip(12, .1, 80, 15500, fs=SR, output="sos"), heard)


dry = scene()
out = record(dry)
generate_wav(out)
```